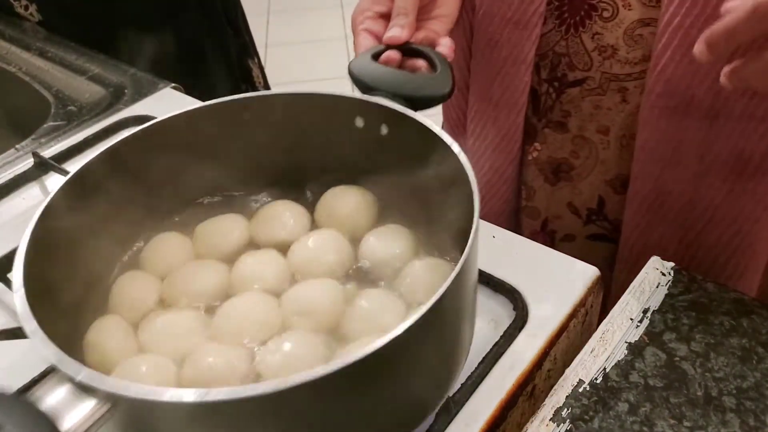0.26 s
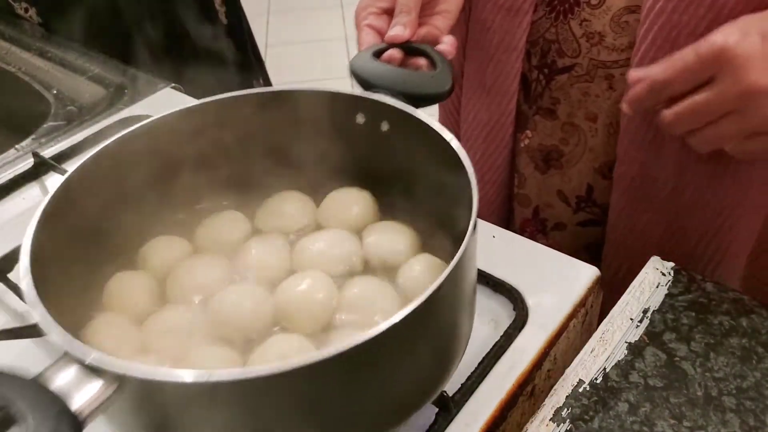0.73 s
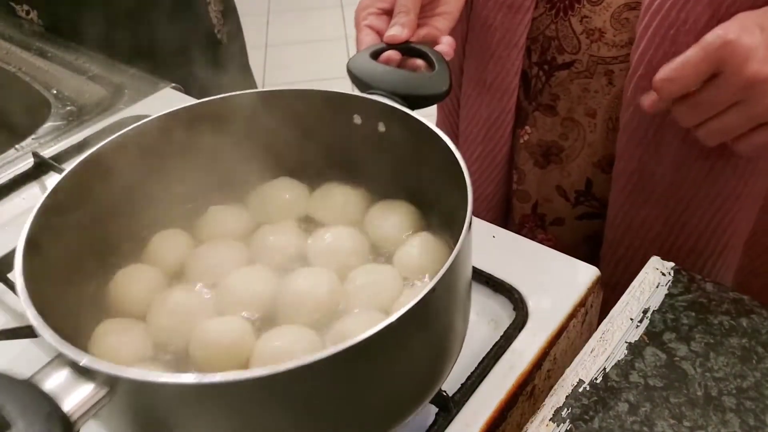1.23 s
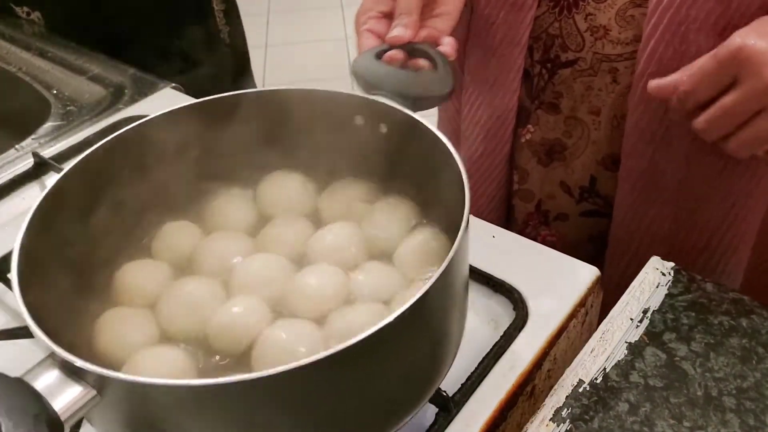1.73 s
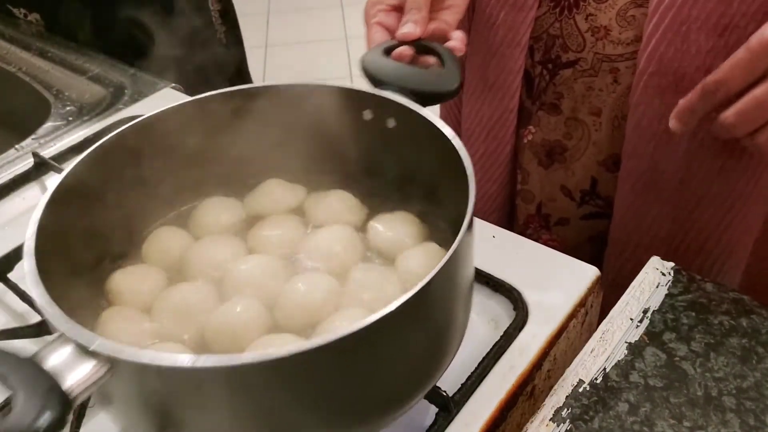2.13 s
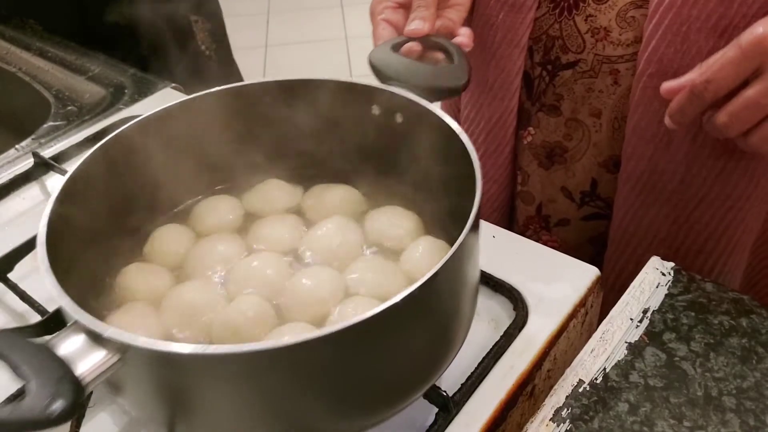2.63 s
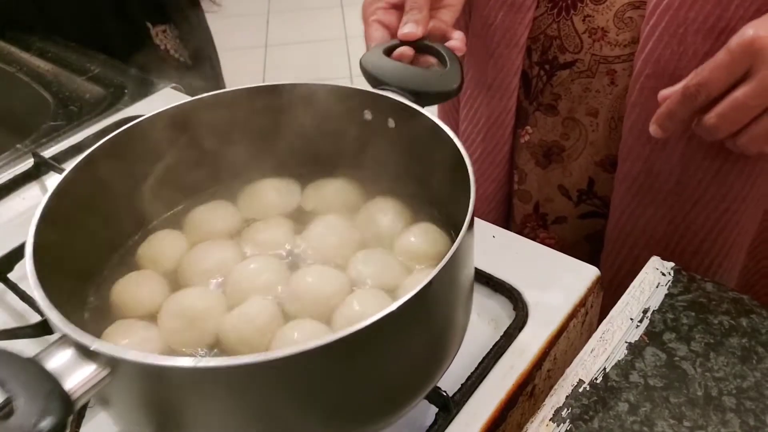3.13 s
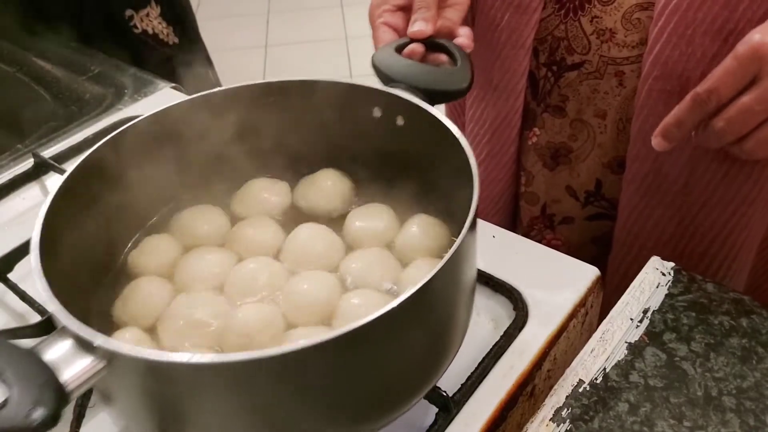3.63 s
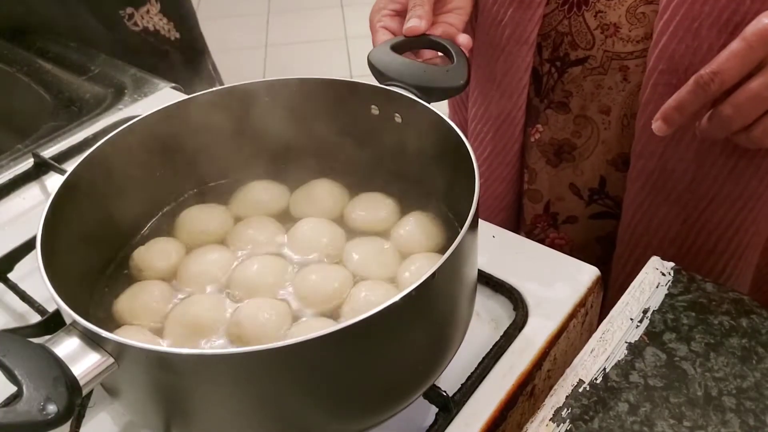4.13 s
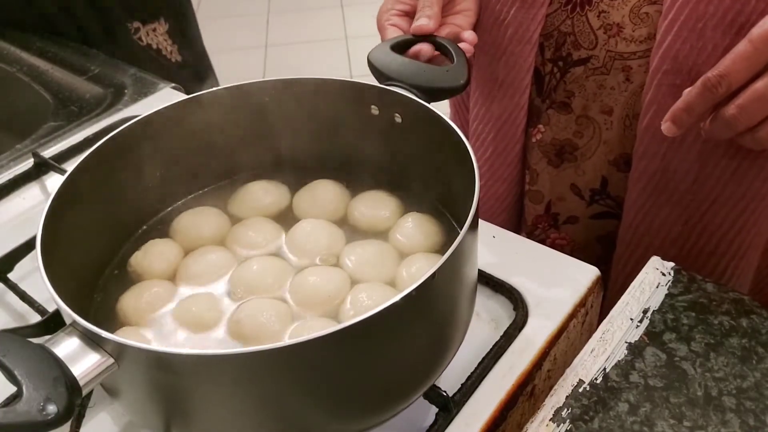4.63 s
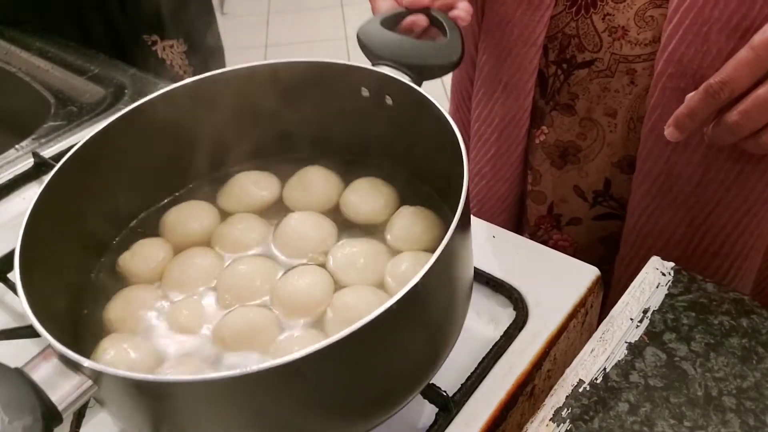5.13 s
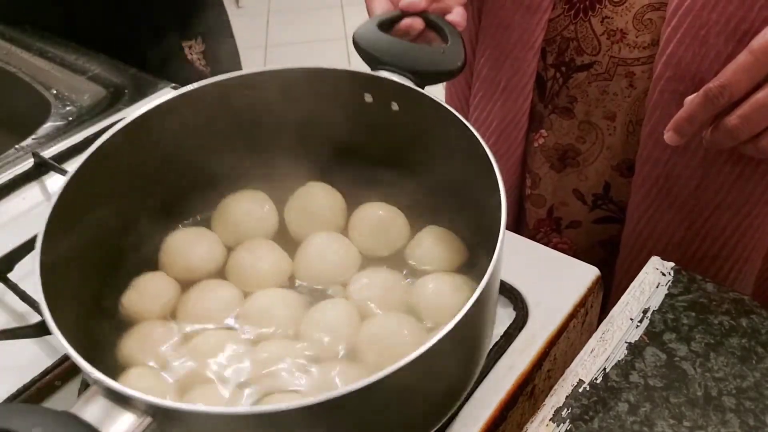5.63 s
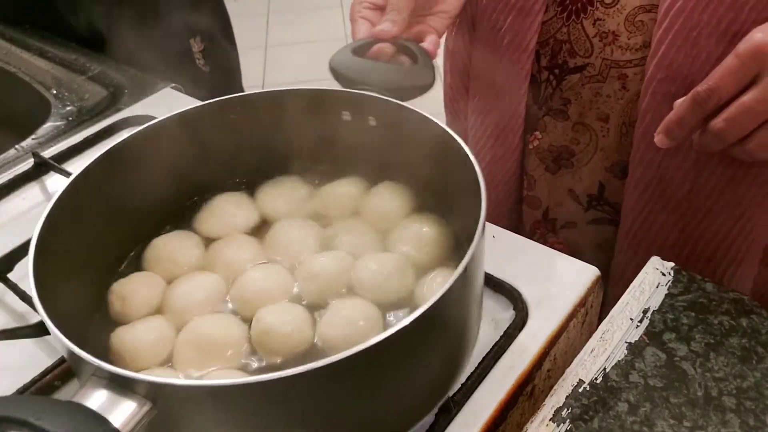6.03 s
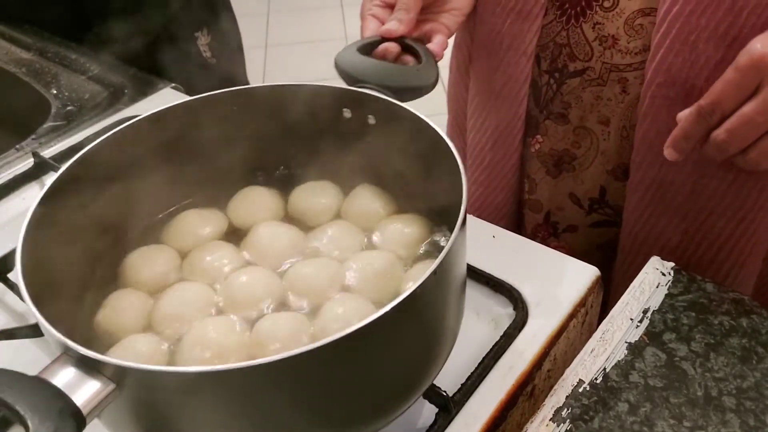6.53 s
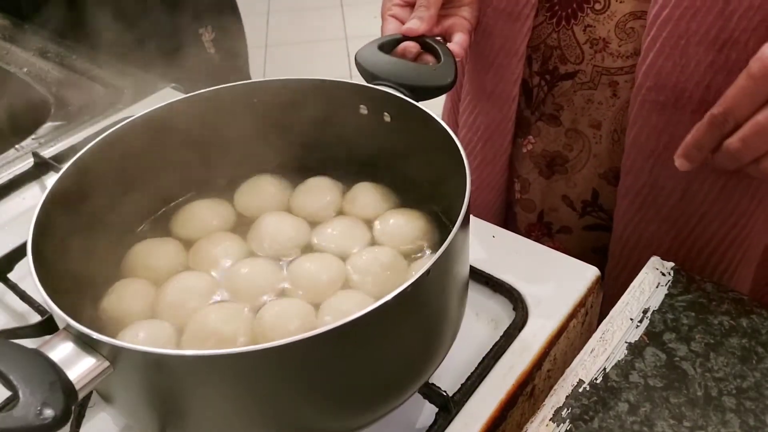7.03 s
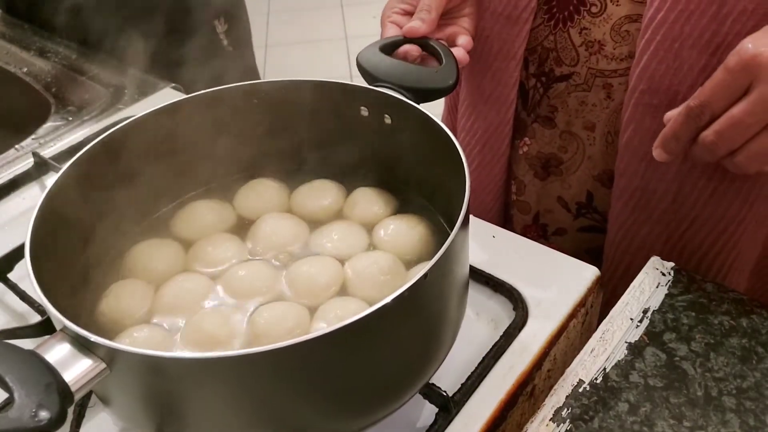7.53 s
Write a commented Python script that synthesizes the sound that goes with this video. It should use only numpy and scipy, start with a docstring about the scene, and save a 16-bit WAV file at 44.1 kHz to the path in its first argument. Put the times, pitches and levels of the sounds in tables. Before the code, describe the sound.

A small kitchen, heard closely from just above a wide metal pot of round sweets in syrup. A faint, steady gas burner hiss with slight whistling and a very soft hum runs throughout. From 0 to 3.9 seconds the syrup bubbles in soft, dull surges about seven a second, hollow inside the pot, with small rounded plops and occasional sharper pops; it grows stronger around 1.6 and 3.0-3.5. Soft low thuds underlie it near 1.6, 2.2 and 2.6. Then boiling pauses: a heavy deep boom hits at 4.1, another at 4.55, and a rattling bump at 5.1, with brief fizzy sprays. The pot knocks dully at 5.4, with smaller bumps around 5.6, and knocks faintly at 5.87. From 6.0 to 7.0 a weaker simmer returns with one pop near 6.55. Mostly hiss remains, with barely audible bumps at 7.4 and 7.7.

```python
"""Sweets simmer in syrup in a wide metal pot on a gas stove, heard from just above in a small kitchen.
From the start the burner hisses steadily (filtered noise) over a faint hum (noise through narrow resonances).
The syrup boils in soft, dull surges (swells of tiny clicks and noise) with bursting bubbles (dying sines),
about seven a second. Midway the boil pauses and heavy bumps thump through pot and stove (low swinging sines
and rattling noise); the pot knocks twice (dying sines and noise). A gentler simmer and faint bumps follow."""
import sys
import numpy as np
from scipy import signal
from scipy.io import wavfile
from scipy.ndimage import uniform_filter1d

SR = 44100
rng = np.random.default_rng(int(sys.argv[2]) if len(sys.argv) > 2 else 0)


def store_pcm(level_fs):
    """Save levels as 16-bit WAV."""
    pcm = np.round(np.clip(level_fs, -1, 1) * 32767).astype(np.int16)
    wavfile.write(sys.argv[1], SR, np.atleast_2d(pcm).T)


N = 342392   # length in samples

# burner loudness over time, before its layers are trimmed: (time [s], level [dB])
FLAME_LEVEL = [(0.0, -55.5), (1.58, -55), (5.03, -56), (5.36, -54.5), (5.62, -55), (7.76, -55.5)]
# broad spectrum of the burner hiss: (frequency [Hz], level per half octave [dB])
FLAME_COLOUR = [(35, -16), (70, -9.5), (130, -12.5), (300, -11.5), (600, -4.5), (1200, -0.5), (2000, 0.5),
                (3600, -4), (5600, -6.5), (8500, 0.5), (11000, -6), (15000, -4.5)]
# whistling resonances of jet and burner: (frequency [Hz], width before widening [Hz], relative level [dB])
JET_WHISTLES = [(1884, 110, -5), (4506, 187, -7), (4750, 460, -9.5), (6957, 480, -5.5), (8300, 530, -11.5),
                (9080, 310, -13), (13800, 260, -22)]
# swelling of the 4.5 kHz whistle, used relative to its own average: (time [s], level [dB])
WHISTLE_SWING = [(0.0, -66.5), (0.62, -59.5), (2.05, -58), (2.53, -61.5), (7.65, -65), (7.76, -63)]
# early echoes of the burner from near walls: (left delay [s], right delay [s], level [dB])
WALLS = [(.0023, .0026, -12.5), (.0061, 0.008, -9.5), (0.0109, 0.01, -11.5)]
# faint hum of the kitchen and ringing of the burner: (frequency [Hz], width [Hz], rms level [dB])
HUM = [(99, 6.6, -73.5), (146, 48, -75.5), (342, 26, -77), (640, 51, -65.5), (865, 28, -75), (990, 26, -71),
       (1128, 7.2, -75), (1223, 8.3, -78.5), (1330, 53, -88), (1677, 18, -68.5), (1872, 21, -61),
       (2008, 42, -62), (2480, 26, -77), (2905, 45, -78), (3275, 26, -77.5), (4560, 61, -69.5),
       (6740, 93, -79.5), (8500, 30, -81)]
# surges of the boil: (onset [s], level before trim [dB], hold [s], extra bass [dB])
SURGES = [(0.009, -35, 0.033, 5.5), (0.177, -32, 0.046, -3), (0.33, -35, 0.03, -2), (0.486, -36, 0.036, 4),
          (0.629, -38.5, 0.04, 0), (0.772, -33.5, 0.038, -1), (0.859, -34, 0.045, 5),
          (1.041, -33.5, 0.039, -1.5), (1.169, -40, 0.043, 5), (1.317, -32, 0.04, 4.5),
          (1.41, -32.5, 0.038, 2.5), (1.589, -28, 0.032, 0), (1.704, -29, 0.037, 1),
          (1.868, -29.5, 0.038, 4.5), (1.988, -29.5, 0.035, 2.5), (2.15, -28.5, 0.03, -0.5),
          (2.257, -31.5, 0.044, 4), (2.409, -34.5, 0.047, 2.5), (2.519, -34, 0.045, 4),
          (2.65, -31.5, 0.032, 5), (2.789, -38, 0.04, 10), (2.919, -37.5, 0.044, 8),
          (3.052, -28.5, 0.031, -1), (3.219, -30.5, 0.032, -1), (3.357, -27, 0.035, -6),
          (3.529, -29.5, 0.04, -3.5), (3.659, -32, 0.048, -1), (3.799, -36, 0.037, -6),
          (5.989, -40.5, 0.04, 3.5), (6.129, -38, 0.04, -5), (6.255, -37.5, 0.058, -5),
          (6.409, -38, 0.04, -5.5), (6.539, -37.5, 0.032, -1.5), (6.641, -39.5, 0.043, -2),
          (6.78, -42.5, 0.039, 2), (6.909, -39.5, 0.049, -1)]
# colour of the boil: (frequency [Hz], level per half octave [dB])
SURGE_COLOUR = [(35, -22), (60, -18), (110, 0), (180, -9.5), (350, -7), (600, -12.5), (800, -13.5),
                (1300, -14), (2800, -21.5), (6000, -21), (14000, -27)]
# hollow of the pot above the syrup: (frequency [Hz], width [Hz], added level [dB])
POT_HOLLOW = [(116, 15, -5), (175, 8.6, -5.5), (243, 15.5, -2), (334.4, 39, -3.5), (420, 2.9, -11),
              (477, 23.5, 2), (581, 29, -2.5), (638.4, 11.3, 8), (872, 17, 3), (970, 12, -1),
              (1140, 18, 2.5), (1244, 10, -24), (1400, 10, -27), (1640, 26, -10.5), (2450, 20, 6)]
# sharpest bursting bubbles: (onset [s], level [dB], frequency [Hz])
POPS = [(0.192, -33.5, 790), (0.338, -40, 1105), (1.606, -33.5, 1344), (1.707, -35, 1347),
        (2.304, -39, 977), (3.315, -40.5, 1220), (3.361, -39, 1490), (3.389, -32.5, 610),
        (3.534, -38, 1240), (6.556, -35, 1680)]
# big bubbles heave the pot: (peak time [s], boom level [dB], boom frequency [Hz], rise [s], rattle level [dB])
BUMPS = [(0.855, -40, 60.1, 0.025, -62), (1.556, -29.5, 56, 0.021, -51), (1.893, -34, 60.6, 0.025, -58),
         (2.208, -24.5, 56.8, .022, -55), (2.573, -21.5, 61, 0.023, -55), (2.968, -32.5, 62, 0.024, -55),
         (4.035, -30, 60, 0.028, -39), (4.1, -12, 58, 0.015, -33), (4.18, -30, 110.8, 0.016, -42.5),
         (4.547, -15, 58.5, .022, -37.5), (4.678, -34, 55, 0.03, -50), (5.086, -27.5, 236.5, 0.0094, -30.5),
         (5.117, -18, 93.7, 0.022, -34), (5.189, -45, 94, 0.023, -43), (5.372, -40.5, 92, .03, -48),
         (5.512, -38, 85.3, 0.017, -36.5), (5.573, -27.5, 99, .025, -39), (5.66, -38, 83.5, 0.053, -44.5),
         (5.74, -41, 84, 0.043, -60), (7.385, -43.5, 91.2, 0.02, -53), (7.437, -44, 75.4, .015, -57),
         (7.668, -39.5, 127, 0.018, -60), (7.69, -37.5, 66.6, 0.04, -60)]
# the pot's metal, shaken by each boom: (frequency [Hz], level against the boom [dB], time to fall 60 dB [s])
METAL = [(379, -33, 0.16), (399, -24.5, 0.39), (530, -34, 0.31), (740, -41, 0.5), (1830, -49, 0.36)]
# colour of the rattle of bumps and knocks: (frequency [Hz], level per half octave [dB])
KNOCK_COLOUR = [(35, -21), (60, -2), (110, -1.5), (180, -5.5), (260, -5), (350, -8), (550, -9), (800, -17),
                (1300, -12.5), (2800, -17.5), (6000, -30), (14000, -48)]
# sprays of fine bubbles: (peak time [s], level [dB])
SPRAYS = [(2.0, -61), (4.125, -50.5), (4.21, -55.5), (4.59, -58.5), (5.118, -48.5), (5.36, -57)]
# colour of the sprays: (frequency [Hz], level per half octave [dB])
SPRAY_COLOUR = [(35, -60), (900, -10), (2300, 3.5), (4000, -2.5), (8000, -6.5), (15000, -13)]
# the pot knocks on its grate: (onset [s], level [dB])
KNOCKS = [(5.421, -26.5), (5.87, -38.5)]
# what a knock sets ringing: (frequency [Hz], level against the knock [dB], time to fall 60 dB [s])
KNOCK_MODES = [(88.6, 1, 0.43), (338, 3, 0.093), (530, -6, 0.034), (1260, -8, .04), (1560, -0.5, 0.019),
               (2510, -4, 0.037)]
# how alike left and right are: (frequency [Hz], correlation [-1 to 1])
LIKENESS = [(50, 0.74), (90, 0.94), (180, 0.9), (350, 0.54), (700, 0.37), (1400, 0.042), (4000, 0.31),
            (14000, 0.16)]
# left against right: (frequency [Hz], level difference [dB])
BALANCE = [(50, -10), (90, 1), (180, 3), (350, 1.5), (700, 0.5), (2800, -1.5), (5600, -1), (9500, 3.5),
           (14000, -2.5)]

BAND_EDGES = 30 * 2 ** np.arange(0, 9.6, .5)   # half octaves [Hz]
BAND_CENTRES = np.sqrt(BAND_EDGES[1:] * BAND_EDGES[:-1])
TIME = np.arange(N) / SR   # [s]
COARSE = TIME[::20]   # sparse time grid for slow curves [s]

KITCHEN_T60_S, KITCHEN_DB = 0.55, -14   # the kitchen's tail: time to fall 60 dB, level
BOIL_LAG_S, BURNER_LAG_S = .00014, .00036   # how much later the right side hears each
CUTOFF_HZ = 15650
# every surge swells, holds and dies away alike; the swell starts before the first collapse
SURGE_RISE_S, SURGE_FALL_S, SURGE_LEAD_S, SURGE_DB = 0.018, 0.053, 0.0099, -10
# stronger surges hold bigger bubbles and sound deeper; surges with extra bass are duller
SURGE_MID_DB, BASS_PER_DB, TREBLE_PER_BASS = -31, 0.55, -0.15
POP_T60_S, POP_RISE_S = 0.059, 0.0024
BOOM_FALL_S, RATTLE_FALL_S, RATTLE_LEAD_S = 0.031, 0.052, 0.0042   # the rattle peaks just before the boom
RATTLE_BASS_DB, RATTLE_TREBLE_DB = 4.5, -9
SPRAY_RISE_S, SPRAY_FALL_S = 0.029, 0.067
KNOCK_RISE_S, KNOCK_FALL_S, KNOCK_BASS_DB, KNOCK_TREBLE_DB = 0.0017, 0.052, -2.5, -1


def from_db(db):
    """Turn decibels into gain."""
    return 10 ** (np.asarray(db) / 20)


def rms_one(x):
    """Scale a sound to an rms level of 1."""
    return x / np.sqrt(np.mean(x ** 2) + 1e-20)


def at_hz(points, hz):
    """Read a curve over frequency, spaced the way we hear pitch (logarithmically)."""
    curve_hz, values = np.transpose(points)
    return np.interp(np.log(hz), np.log(curve_hz), values)


def in_time(rows):
    """Read a curve over time at every sample."""
    return np.interp(TIME, *np.transpose(rows))


def drift(rate_hz):
    """Smooth random wandering of spread 1 on the coarse time grid: noise smoothed twice."""
    r = np.exp(-2 * np.pi * rate_hz * COARSE[1])
    noise = rng.standard_normal(2 * len(COARSE))
    smooth = signal.lfilter([1], [1, -2 * r, r * r], noise)
    return rms_one(smooth[-len(COARSE):])   # the first half only settles the filter


def resonance(x, hz, width_hz):
    """Let x ring at one frequency: a two-pole resonance with gain 1 at its top."""
    r = np.exp(-np.pi * width_hz / SR)
    top = np.array([1, 0, -1]) * (1 - r * r) / 2
    return signal.lfilter(top, [1, -2 * r * np.cos(2 * np.pi * hz / SR), r * r], x)


def swell(s, rise, fall, hold=0):
    """A rounded rise to 1 at time s, a hold, then an exponential fall."""
    rising = (np.minimum(COARSE - s, 0) / rise) ** 2
    falling = np.maximum(COARSE - s - hold, 0) / fall
    return np.exp(-rising - falling)


def dying_sine(hz, t60, glide):
    """A dying sine; with glide its pitch climbs, as a bursting bubble's does."""
    t = TIME[:int(SR * t60)]
    return from_db(-60 * t / t60) * np.sin(2 * np.pi * hz * t * (1 + glide * t / t60))


def add(out, s, sound):
    """Mix a short sound in at time s."""
    start = int(np.clip(s * SR, 0, N - 1))
    out[start:start + len(sound)] += sound[:N - start]


def delayed(x, s):
    """The same sound, s seconds later."""
    return np.concatenate([np.zeros(round(abs(s) * SR)), x])[:N]


def from_left(x, lag_s):
    """Sound from a source to the left reaches the right side later."""
    return np.array([x[0], delayed(x[1], lag_s)])


def near_walls(x):
    """A few early echoes off near walls, different left and right, ripple the spectrum."""
    echoes = [from_db(db) * np.array([delayed(x[0], left_s), delayed(x[1], right_s)])
              for left_s, right_s, db in WALLS]
    return x + sum(echoes)


def play_bands(gains, direct, even_s):
    """Half-octave stereo bands on their gain curves: direct sound in the middle, diffuse noise at the sides."""
    out = np.zeros((2, N))
    diffuse = rng.standard_normal((2, N))
    for k, hz in enumerate(BAND_CENTRES):
        band_filter = signal.butter(2, BAND_EDGES[k:k + 2], "band", fs=SR, output="sos")
        band = signal.sosfilt(band_filter, [direct[k % 2] + 1e-18, diffuse[k % 2]])
        # even out the band's own loudness, so that the gain curve sets it
        power = np.abs(uniform_filter1d(band ** 2, int(SR * (even_s + 2 / hz))))
        mid, side = band / np.sqrt(power + 1e-12)
        alike = np.clip(at_hz(LIKENESS, hz), -1, 1)
        mid = mid * np.sqrt((1 + alike) / 2)
        side = side * np.sqrt((1 - alike) / 2)
        gain = np.interp(TIME, COARSE, gains[k])
        pan_db = at_hz(BALANCE, hz) / 2
        out[0] += gain * from_db(pan_db) * (mid + side)
        out[1] += gain * from_db(-pan_db) * (mid - side)
    return out


def burst_power(s, rise, hold, fall, colour, level_db, bass_db, treble_db):
    """Power per band of one burst, with the kitchen's short tail."""
    bass = at_hz([(130, 0.8), (350, 0)], BAND_CENTRES)
    treble = at_hz([(450, 0), (1400, 1)], BAND_CENTRES)
    gains = from_db(level_db + at_hz(colour, BAND_CENTRES) + bass * bass_db + treble * treble_db)
    burst = swell(s, rise, fall, hold)
    # a fall of 60 dB is a factor of 1000
    tail = from_db(KITCHEN_DB) * swell(s, rise, KITCHEN_T60_S / np.log(1000), hold)
    return np.outer(gains ** 2, burst ** 2 + tail ** 2)


def burner(flicker_db, hiss_db, whistle_db):
    """Gas rushes through jet and burner: a smooth hiss with a few broad whistles, one of which swells and sinks."""
    gains = [from_db(hiss_db + at_hz(FLAME_COLOUR, hz) + flicker_db * drift(rate_hz=8.4))
             for hz in BAND_CENTRES]
    out = play_bands(gains, rng.standard_normal((2, N)), even_s=.4)
    swing_db = in_time(WHISTLE_SWING)
    swing_db = swing_db - swing_db.mean()
    for k, (hz, width_hz, db) in enumerate(JET_WHISTLES):
        wide_hz = width_hz * 1.42   # two resonances in a row narrow the peak, so each is wider
        whistle = rng.standard_normal((2, N))
        for _ in range(2):
            whistle = resonance(whistle, hz, wide_hz)
        change_db = swing_db if k == 1 else 0   # only the 4.5 kHz whistle swings
        out += rms_one(whistle) * from_db(whistle_db + db + change_db)
    return out * from_db(in_time(FLAME_LEVEL))


def hum():
    """Narrow, wavering tones in the kitchen's background: noise through sharp resonances."""
    return sum(from_db(db) * rms_one(resonance(rng.standard_normal((2, N)), hz, width_hz))
               for hz, width_hz, db in HUM)


def grains(per_s, spread_db):
    """Two unrelated trains of tiny collapses: clicks of uneven size at random times."""
    size_db = spread_db * np.minimum(rng.exponential(1, (2, N)), 4)
    sizes = from_db(size_db) * rng.choice([-1, 1], (2, N))
    return rms_one(sizes * (rng.random((2, N)) < per_s / SR))


def boil():
    """Surges are clusters of vapour collapses, muffled by the syrup and coloured by the pot's hollow."""
    power = 0
    for s, db, hold, extra_bass_db in SURGES:
        peak_s = s - SURGE_LEAD_S + SURGE_RISE_S
        bass_db = extra_bass_db + BASS_PER_DB * (db - SURGE_MID_DB)
        power = power + burst_power(peak_s, SURGE_RISE_S, hold, SURGE_FALL_S, SURGE_COLOUR,
                                    db + SURGE_DB, bass_db, TREBLE_PER_BASS * extra_bass_db)
    collapses = grains(per_s=450, spread_db=3.5) + from_db(-10) * rng.standard_normal((2, N))
    sound = play_bands(np.sqrt(power), collapses, even_s=0.0323)
    sound = sound + plops(cycles=28, glide=0.089, count=6) + pops(splash_db=-6.5, splash_s=.016)
    hollow = sum(from_db(db) * resonance(sound, hz, width_hz) for hz, width_hz, db in POT_HOLLOW)
    return sound + hollow


def plops(cycles, glide, count):
    """Each surge lets a few bubbles burst at the surface, as dying sines placed and pitched by chance."""
    out = np.zeros(N)
    all_draws = rng.random((len(SURGES), count, 2))
    for (s, db, hold, _), draws in zip(SURGES, all_draws):
        for k, (when, size) in enumerate(draws):
            hz = 260 * 5 ** ((k + size) / count)   # spread from 260 to 1300 Hz
            tone = dying_sine(hz, cycles / hz, glide)
            soft_start = 1 - np.exp(-TIME[:len(tone)] * hz / 2)
            gain = from_db(db + at_hz(SURGE_COLOUR, hz))
            add(out, s + when * (SURGE_RISE_S + hold), gain * tone * soft_start)
    return out


def pops(splash_db, splash_s):
    """The sharpest bursts: a short ring inside a dull splash of droplets."""
    out = np.zeros(N)
    t = TIME[:SR // 8]
    for s, db, hz in POPS:
        splash = rng.standard_normal(len(t)) ** 3   # cubing makes the noise spiky, like droplets
        for _ in range(2):
            splash = resonance(splash, hz, hz * 1.1)
        sound = from_db(splash_db) * rms_one(splash) * np.exp(-t / splash_s)
        add(sound, 0, dying_sine(hz, POP_T60_S, glide=0))
        cushion = 1 - np.exp(-t / POP_RISE_S)   # the syrup cushions the first cycles
        add(out, s, from_db(db) * sound * cushion)
    return out


def booms():
    """Big bubbles heave the pot; it swings a few cycles, with a weaker octave, and its metal rings on."""
    out = np.zeros(N)
    for s, db, hz, rise, _ in BUMPS:
        phase = 2 * np.pi * hz * (TIME - s)
        octave = np.sin(2 * phase + rng.uniform(0, 2 * np.pi))
        swing = np.sin(phase) + from_db(-12.5) * octave
        out += from_db(db) * np.interp(TIME, COARSE, swell(s, rise, BOOM_FALL_S)) * swing
        for mode_hz, mode_db, t60 in METAL:
            tone = dying_sine(mode_hz, t60, glide=0)
            soft_start = 1 - np.exp(-TIME[:len(tone)] / (rise / 2))
            gain = from_db(db + mode_db + rng.normal(0, 2.3))
            add(out, s - rise, gain * tone * soft_start)
    return out * from_db([[-.4], [.4]])   # slightly stronger on the right


def rattle(dip):
    """Bumps and knocks rattle the pot from below, as bursts of noise; sprays of fine bubbles add more."""
    power = 0
    for s, _, _, rise, db in BUMPS:
        power = power + burst_power(s - RATTLE_LEAD_S, rise, 0, RATTLE_FALL_S, KNOCK_COLOUR,
                                    db, RATTLE_BASS_DB, RATTLE_TREBLE_DB)
    for s, db in SPRAYS:
        power = power + burst_power(s, SPRAY_RISE_S, 0, SPRAY_FALL_S, SPRAY_COLOUR, db, 0, 0)
    for s, db in KNOCKS:
        power = power + burst_power(s + KNOCK_RISE_S, KNOCK_RISE_S, 0, KNOCK_FALL_S, KNOCK_COLOUR,
                                    db, KNOCK_BASS_DB, KNOCK_TREBLE_DB)
    sound = play_bands(np.sqrt(power), rng.standard_normal((2, N)), even_s=0.024)
    # the pot barely moves between its low modes
    sound = sound - dip * resonance(sound, hz=226, width_hz=50)
    low_ring = from_db(-12) * resonance(sound, hz=402, width_hz=16)
    high_ring = from_db(-8) * resonance(sound, hz=1910, width_hz=67)
    return sound + low_ring + high_ring


def clonks():
    """Each knock sets the pot's body ringing in several dying sines."""
    out = np.zeros(N)
    for s, db in KNOCKS:
        for hz, mode_db, t60 in KNOCK_MODES:
            add(out, s, from_db(db + mode_db) * dying_sine(hz, t60, glide=0))
    return out


def scene():
    """Burner, kitchen and pot together."""
    flame = burner(flicker_db=1.83, hiss_db=-7.0, whistle_db=1)
    hiss = near_walls(from_left(flame, BURNER_LAG_S))
    pot = from_left(boil() + rattle(dip=0.38) + clonks(), BOIL_LAG_S) + booms()
    return hiss + hum() + pot


def record(dry):
    """The microphone drops the deepest bass; the top is cut."""
    bass_cut = signal.butter(2, 30, "high", fs=SR, output="sos")
    top_cut = signal.ellip(10, .2, 80, CUTOFF_HZ, fs=SR, output="sos")
    return signal.sosfilt(top_cut, signal.sosfilt(bass_cut, dry))


dry = scene()
out = record(dry)
store_pcm(out)
```